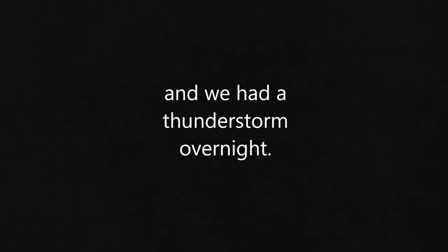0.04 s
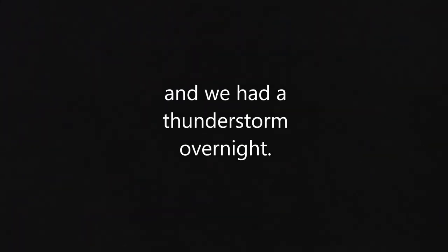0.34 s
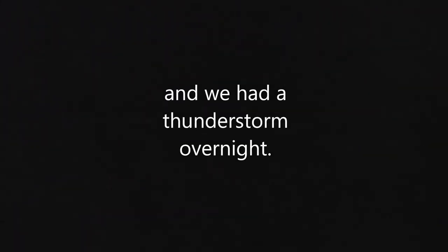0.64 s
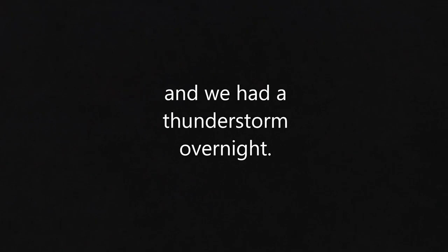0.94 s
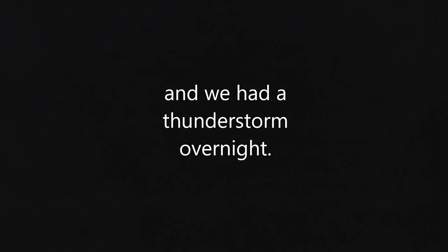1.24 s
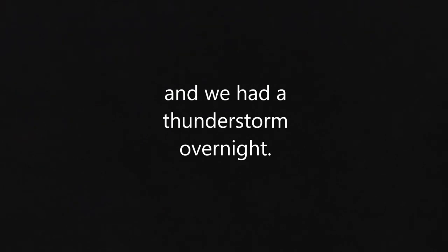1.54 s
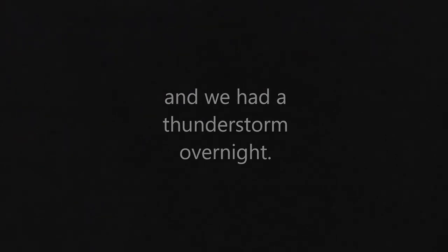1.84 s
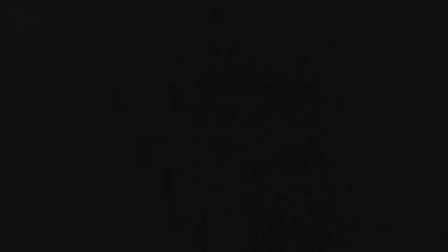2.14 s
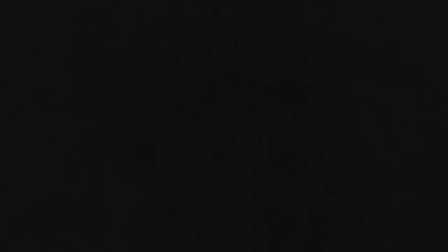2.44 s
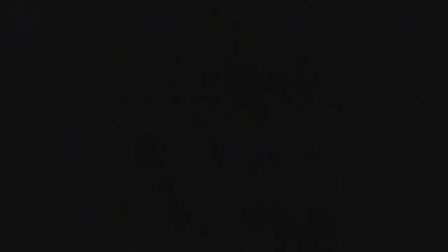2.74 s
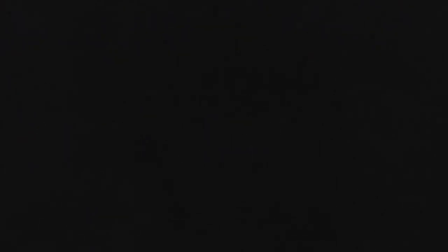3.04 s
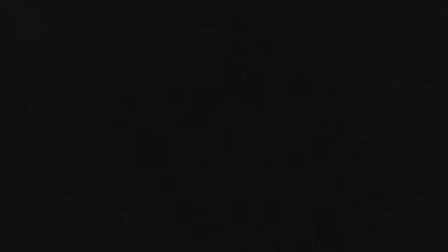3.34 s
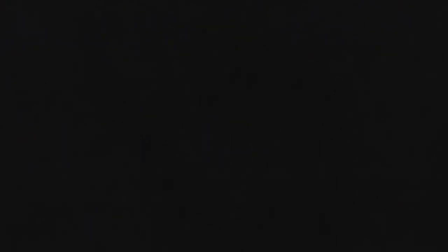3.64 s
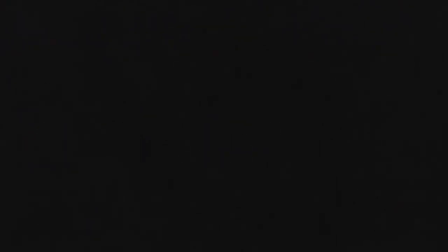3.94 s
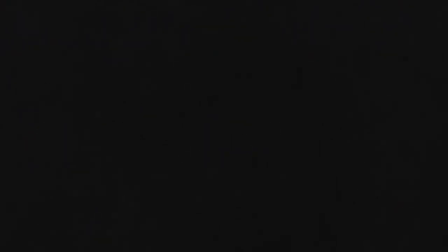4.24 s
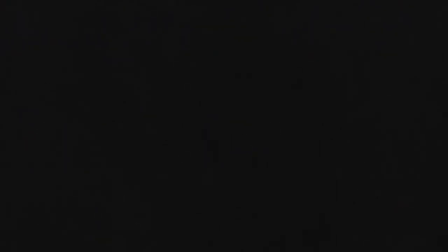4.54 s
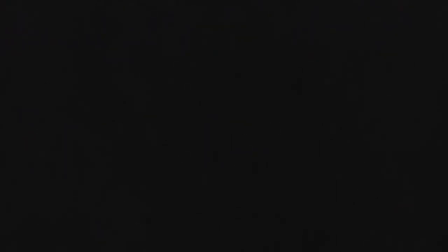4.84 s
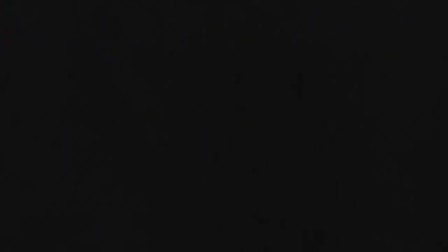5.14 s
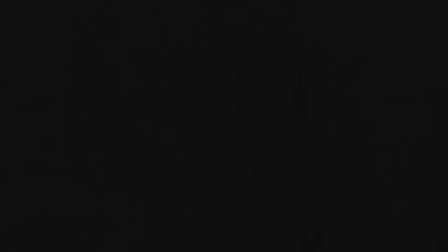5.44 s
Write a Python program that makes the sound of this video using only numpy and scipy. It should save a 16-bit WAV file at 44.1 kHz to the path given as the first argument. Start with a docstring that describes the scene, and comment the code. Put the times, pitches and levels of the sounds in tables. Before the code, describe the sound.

Deep thunder rolls from the very start, loudest in the first second, then rumbles on in several weaker peals, swells once more and dies down. Steady rain patters on a tent throughout, with heavier drops tapping and splashing on the taut fabric over a soft hiss of farther rain. The microphone is outdoors at the tent, close to the drops, with the thunder some way off.

```python
"""At a tent in steady rain, thunder rolls in several peals and dies away.
Shock fronts from the lightning channel blur with distance into boom, body and growl.
Near drops pat the taut fabric and splash; countless far ones merge into a wash.
Two spaced microphones hear the bass alike and most drops a little earlier on the left."""
import sys
import numpy as np
from scipy import signal
from scipy.fft import rfft, irfft, next_fast_len
from scipy.io import wavfile
from scipy.ndimage import uniform_filter1d, map_coordinates

SR = 44100
rng = np.random.default_rng(int(sys.argv[2]) if len(sys.argv) > 2 else 0)


def inscribe(sig):
    """Save sig as 16-bit PCM at rate SR to the path in sys.argv[1].

    A 1-D sig is mono; a 2-D sig holds one channel per row.
    Samples are clipped to [-1, 1] before scaling.
    """
    pcm = np.round(np.clip(np.atleast_2d(sig).T, -1, 1) * 32767)
    wavfile.write(sys.argv[1], SR, pcm.astype(np.int16))


N = 251370

# peals of thunder: t/s, hold/s, body level/dB, boom over body/dB, growl over body/dB
PEALS = [(0.03, 0.022, -22, 5, -17), (0.061, 0.028, -12.5, -3, -19), (0.14, 0.085, -22, 2, -9),
         (0.259, 0.061, -19.5, 1.5, -10.5), (0.34, 0.11, -17.5, -1.5, -11.5), (0.49, 0.15, -20, 1.5, -7.5),
         (0.68, 0.2, -28.5, 2.5, 0.5), (1.04, 0.02, -23.5, -5, -14.5), (1.185, 0.019, -21, -5, -9),
         (1.25, 0.088, -22.5, -3.5, -10.5), (1.559, 0.041, -24.5, -2, -4.5), (1.73, 0.081, -34.5, 4, 8),
         (1.867, 0.026, -21.5, 6, -1.5), (1.945, 0.037, -22, 7, -0.5), (1.999, 0.063, -18.5, 1, -0.5),
         (2.09, 0.078, -23, -7, -12), (2.26, 0.1, -27, 4.5, -2), (2.4, 0.078, -29, 5, 4),
         (2.66, 0.11, -30.5, 0.5, -2), (2.851, 0.042, -27, -18, 3.5), (2.95, 0.04, -25.5, -2.5, -1),
         (3.015, 0.024, -20, 0.5, -4), (3.209, 0.12, -29.5, 2.5, 5), (3.554, 0.022, -25, 0, 0),
         (3.615, 0.061, -26.5, -6, 4.5), (3.674, 0.04, -22.5, 1, 0), (3.858, 0.275, -20.5, -2, -3.5),
         (4.15, 0.071, -23.5, 2, 2.5), (4.28, 0.045, -29.5, 1.5, -7.5), (4.74, 0.032, -32, -1.5, 2),
         (4.96, 0.022, -27, 2, -2), (5.22, 0.12, -33, 2, 2), (5.509, 0.095, -39.5, 7, -27)]
# the heaviest close drops: t/s, pat/dB, pat pitch/Hz, splash/dB, spray/dB, side (+ left, - right)
HEAVY_DROPS = [(0.0557, -21.5, 875, -32.5, -42, .1), (0.064, -22, 1020, -49, -53, -.8),
               (0.0841, -29, 745, -39, -44, -1), (0.2986, -28.5, 1230, -37.5, -48.5, -1.1),
               (0.375, -23, 930, -30, -45, 0.72), (0.4102, -26.5, 980, -46, -50, .6),
               (0.4506, -45, 900, -51, -48, .8), (0.4678, -37, 690, -42, -44, 1),
               (0.5833, -25, 666, -38.5, -46, 0.58), (0.6061, -26, 880, -40, -46, .4),
               (0.6126, -23.5, 965, -41, -48, 0.94), (0.6844, -32, 920, -51, -50, -0.67),
               (0.7454, -25.5, 1250, -42, -52, -0.12), (0.753, -28.5, 1100, -36, -48.5, 0.66),
               (0.9614, -33.5, 1330, -40, -51.5, .2), (0.9677, -24, 960, -37.5, -45, .7),
               (1.0529, -36, 1480, -37.5, -49, -1), (1.1577, -34, 1290, -37, -42.5, 0.61),
               (1.2874, -30, 985, -35.5, -50, .6), (1.3003, -30, 960, -35, -54, .3),
               (1.5264, -22.5, 1140, -37, -53, 0.19), (1.5363, -31, 1080, -38, -47, 0.87),
               (1.7217, -33, 955, -38, -44.5, .5), (1.867, -21.5, 745, -41, -52, .9),
               (1.8737, -27, 870, -41, -48.5, .9), (1.9549, -26, 834, -42, -49, .8),
               (2.0878, -29.5, 910, -38.5, -42, 0.8), (2.1794, -27, 1060, -30, -41, 1),
               (2.2449, -29, 1130, -34, -47, .8), (2.2767, -28, 890, -36, -42, 0.92),
               (2.3149, -29, 805, -28.5, -43, 0.25), (2.3403, -26, 770, -41, -51, 0.87),
               (2.5404, -34, 855, -37.5, -46, -1.3), (2.7251, -30, 860, -33, -47, 0.86),
               (2.7385, -26, 1040, -33, -42.5, .5), (2.7716, -24.5, 864, -34, -45, 1),
               (2.89, -30, 725, -48, -60, 0.97), (2.9532, -23.5, 1060, -34, -48, 0.99),
               (3.0224, -23, 754, -39, -58, 0.91), (3.1025, -23.5, 930, -33.5, -49, 0.95),
               (3.1949, -29, 1110, -32, -45, -1), (3.2959, -26, 1160, -32.5, -51, -1.1),
               (3.3611, -33.5, 1350, -41, -57, 1), (3.5174, -26.5, 1080, -39, -52, 1),
               (3.782, -31, 890, -35.5, -57, 0.79), (3.8466, -29, 1020, -34.5, -51, 0.9),
               (4.1533, -19.5, 905, -30, -41.5, 1), (4.227, -18.5, 748, -36, -58, 0.94),
               (4.3386, -25, 764, -41, -62, 1), (4.3529, -26, 840, -35, -57, .7),
               (4.3808, -20.5, 1270, -39, -51, 0.91), (4.429, -26.5, 950, -54, -70, 0.74),
               (4.4458, -25.5, 1370, -35.5, -50, -.2), (4.4553, -25.5, 1190, -37, -56, .6),
               (4.5464, -27.5, 740, -34, -43, 0.25), (4.7157, -34, 1330, -36, -49, 0.72),
               (4.8071, -24.5, 900, -33, -45.5, 0.98), (4.8562, -27, 1090, -47, -57, 0.98),
               (5.0715, -27, 1020, -35, -51, 1), (5.0869, -29, 1260, -32.5, -42.5, .7),
               (5.2226, -25, 784, -37.5, -47, .7), (5.2709, -31, 850, -37.5, -46, 1),
               (5.2835, -21.5, 1070, -38, -51, 1), (5.3123, -27.5, 940, -32.5, -45, -.2),
               (5.3297, -46, 920, -37, -43.5, 1), (5.374, -24, 710, -33, -48, .9),
               (5.4338, -25, 880, -41, -49, -0.85), (5.649, -17.5, 1020, -31.5, -46, 1),
               (5.673, -25, 1140, -41, -50, 1), (5.6777, -27.5, 890, -28, -49, .9)]
# strength of the rain: t/s, level/dB
RAIN_LEVEL = [(0.0, -45.5), (0.2, -52.5), (0.7, -50), (1.45, -50), (2.2, -47), (2.6, -48.5), (3.45, -48.5),
              (4.38, -47.5), (4.6, -48.5), (5.3, -46.5), (5.7, -49.5)]
# bright tone of fine spray: f/Hz, level/dB
SPRAY_SPECTRUM = [(4000, -37), (7000, 5), (8500, -3), (10300, -4), (12500, -1.5), (16000, -1)]
MIC_DELAY_MS = 0.41  # between the microphones, for a drop at side 1


def thunder(right_db=0.77, echo_boom_db=-2.5, echo_growl_db=-1.5, rasp_per_growl=1.04):
    """Far parts of the channel boom, nearer ones add body, growl and rasp; all a little to the right."""
    # the deep boom: f/Hz, level/dB
    boom_spectrum = [(10, -34), (25, -19), (42, -8), (62, 2), (85, 1.5), (115, -3.5), (160, -20.5),
                     (300, -85)]
    # the body of the roll: f/Hz, level/dB
    body_spectrum = [(60, -37.5), (105, -3.5), (135, 2), (200, 2.5), (260, -2.5), (320, -24.5), (500, -76)]
    # the midrange growl: f/Hz, level/dB
    growl_spectrum = [(170, -31), (260, -2.5), (300, 3.5), (365, 2.5), (440, -7.5), (520, -8.5), (650, -15),
                      (760, -15), (1100, -21), (1800, -35.5), (4000, -91)]
    # the growl's rasping upper edge, which swells and fades with it: f/Hz, level/dB
    rasp_spectrum = [(330, -50), (430, 2), (520, 6), (620, -3), (760, 2.5), (950, -14), (1500, -40.5)]
    boom_db, growl_db = np.transpose(PEALS)[3:, :, None]
    # the bass lingers longer; later echoes have come further and are boomier
    boom_level = roll_level(boom_db, echo_boom_db, fall_db_per_s=127, echo_gain_db_per_s=0.55)
    rasp_level = roll_level(rasp_per_growl * growl_db, rasp_per_growl * echo_growl_db)
    boom = amp(-0.34) * boom_level * rumble(boom_spectrum, window=3000)
    body = amp(-0.36) * roll_level(0, 0) * rumble(body_spectrum)
    growl = amp(-0.98) * roll_level(growl_db, echo_growl_db) * rumble(growl_spectrum)
    rasp = amp(-14.5) * rasp_level * rumble(rasp_spectrum)
    return (boom + body + growl + rasp + claps()) * amp([[-right_db], [right_db]])


def roll_level(peal_db, echo_db, attack_s=0.03, fall_db_per_s=220, echo_gain_db_per_s=0):
    """Each peal swells, holds and falls away; its power adds to that of the echoes."""
    # echoes from the land around, fading under the peals: t/s, level/dB
    echo_level = [(0.0, -19.5), (0.95, -29.5), (1.42, -32), (2.2, -26.5), (2.7, -29.5), (3.45, -32),
                  (4.3, -30.5), (4.5, -32), (5.7, -36)]
    onset, hold, body_db = np.transpose(PEALS)[:3, :, None]
    t = np.linspace(0, N / SR, 4000)
    swell = np.clip(1 + (t - onset) / attack_s, 0, 1)
    peals = swell * amp(body_db + peal_db - fall_db_per_s * np.maximum(t - onset - hold, 0))
    echoes = amp(np.interp(t, *np.transpose(echo_level)) + echo_db + echo_gain_db_per_s * t)
    return np.interp(np.arange(N) / SR, t, np.sqrt(np.sum(peals ** 2, axis=0) + echoes ** 2))


def rumble(spectrum, count=5000, window=2000):
    """Shock fronts from all along the lightning channel, blurred by distance, at an even level."""
    # stereo image, mono in the bass and wide above: f/Hz, left-right correlation
    image = [(60, 1), (130, 0.92), (220, 0.84), (340, 0.64), (480, -0.22), (700, -0.13), (1100, -0.67)]
    shocks = [placed(rng.uniform(0, N / SR, count), rng.normal(size=(count, 1))) for _ in range(2)]
    pair = spread(np.array(shocks), spectrum, image)
    power = uniform_filter1d(np.mean(pair ** 2, axis=0), window)
    return pair / np.sqrt(np.abs(power) + 1e-6)


def claps(cycles=0.73, level_db=-3.5, edge_db=-15, edge_ratio=2.7):
    """Each strong front is a short low push with a steep edge that swings back once or twice."""
    # shock fronts that stand out of the roll: t/s, level/dB, f/Hz
    fronts = [(0.067, 2, 172), (0.086, 0, 150), (0.275, 1.5, 114), (0.344, -1, 153), (0.395, -0.5, 170),
              (0.515, -2.5, 138), (0.62, -3, 125), (1.054, -5.5, 146), (2.008, -9.5, 161),
              (2.442, -4.5, 221), (3.288, -9.5, 240), (3.893, -5, 161), (4.041, -6, 152),
              (4.237, -5.5, 290)]
    times, db, hz = np.transpose(fronts)[:, :, None]
    t = np.arange(-SR // 50, SR // 50) / SR
    swing = lambda f: np.cos(2 * np.pi * (f * t + rng.random(f.shape))) * np.exp(-(f * t / cycles) ** 2)
    push = swing(hz) + amp(edge_db) * swing(edge_ratio * hz)
    return placed(times[:, 0] + t[0], amp(db + level_db) * push)


def strike(drops, shared_splash=0.85, detune=0.1, size=400):
    """A drop dents the fabric (pat), bursts (splash) and throws off a fine spray."""
    # the fabric's modes under a drop: multiple of the pat pitch, level/dB, t60/s
    fabric_modes = [(.7, -9.5, 0.0062), (0.999, 14.5, 0.0032), (1.9, -10, 0.0092)]
    # wet tone of the burst: f/Hz, level/dB
    splash_spectrum = [(600, -26.5), (1700, -4.5), (2300, -3), (3100, 3), (4000, 0), (4800, -5.5),
                       (6300, -5), (8300, -37), (12000, -29)]
    times, pat_db, hz, splash_db, spray_db, lag_ms = np.transpose(drops)
    t = np.arange(size) / SR
    # a drop takes about half a millisecond to flatten; its burst peaks after one and is soon over
    swell = 1 - np.exp(-(t / .0005) ** 2)
    puff = t ** 2 * np.exp(-t / .0005)
    burst = lambda: rng.standard_normal((len(times), size)) * puff
    chance = lambda: rng.standard_normal((len(times), 1))
    pat = 0
    for ratio, db, t60 in fabric_modes:  # every spot has its own tension and mix of modes
        decay = amp(db + 2 * chance() - 60 * t / t60)
        mode_hz = ratio * hz[:, None] * np.exp(detune * chance())
        pat += swell * decay * np.sin(2 * np.pi * mode_hz * t)
    arrivals = times - lag_ms / 2000, times + lag_ms / 2000  # left, right
    # the splash is partly the same on both sides, the spray scatters differently to each
    common = shared_splash * burst()
    pats = np.array([placed(at, levelled(pat, pat_db)) for at in arrivals])
    splashes = np.array([placed(at, levelled(common + burst(), splash_db)) for at in arrivals])
    sprays = np.array([placed(at, levelled(burst(), spray_db)) for at in arrivals])
    wet = amp(0.03) * coloured(splashes, splash_spectrum) + amp(3.0) * coloured(sprays, SPRAY_SPECTRUM)
    # pats lean right, the wet sound leans left
    return amp(-0.63) * pats * amp([[-.7], [.7]]) + wet * amp([[.84], [-.84]])


def heavy_drops():
    """Rows for strike: the side on which a drop lands sets the delay between the microphones."""
    return np.array([(*drop, MIC_DELAY_MS * side) for *drop, side in HEAVY_DROPS])


def medium_drops(count=76, pat_db=-35.0, splash_db=-43, spray_db=-55, scatter_db=3.5, pitch_hz=950,
                 left_share=.8, bunched_share=.6, bunch_s=.035):
    """Rows for strike: many medium drops bunch with the heavy ones, the rest fall anywhere."""
    pick = (np.arange(count) + rng.random(count)) / count
    heavy_times = np.array(HEAVY_DROPS)[(pick * len(HEAVY_DROPS)).astype(int), 0]
    beside_heavy = heavy_times + bunch_s * rng.standard_normal(count)
    times = np.where(rng.random(count) < bunched_share, beside_heavy, pick * N / SR)
    pat, pitch, wet, fine = np.clip(rng.standard_normal((4, count)), -2, 2)
    side = np.where(rng.random(count) < left_share, 1, -1)
    return np.transpose([times, pat_db + scatter_db * pat, pitch_hz * np.exp(.2 * pitch),
                         splash_db + scatter_db * wet, spray_db + scatter_db * (wet + fine),
                         MIC_DELAY_MS * side])


def patter(count=1700, pat_db=-45, splash_db=-53, spray_db=-66, pitch_hz=1000, left_share=.8):
    """Smaller drops all over the tent, most of them on its left slope."""
    times = rng.uniform(0, N / SR, count)
    weight, pitch, wet, fine, place = rng.standard_normal((5, count))
    lag_ms = np.where(rng.random(count) < left_share, .44, -.42) + .08 * place
    rain_db = curve(RAIN_LEVEL)
    size_db = 3.5 * np.minimum(weight, 1.7) + (rain_db - rain_db.mean())[(times * SR).astype(int)]
    wet_db = size_db + 2 * wet
    return strike(np.transpose([times, pat_db + size_db, pitch_hz * np.exp(.3 * pitch),
                                splash_db + wet_db, spray_db + wet_db + 2 * fine, lag_ms]))


def droplets(drops, count=8, flight_s=0.013, level_db=-5, scatter_db=4):
    """Each close drop throws off droplets that land again within a few hundredths of a second."""
    times, _, _, _, spray_db, _ = np.repeat(drops, count, axis=0).T
    window = np.hanning(SR // 900)
    landing = times + flight_s * rng.exponential(size=len(times))
    gain = amp(spray_db + level_db + scatter_db * np.minimum(rng.standard_normal(len(times)), 2))
    envelopes = gain[:, None] * window
    ticks = [placed(landing, envelopes * rng.standard_normal(envelopes.shape)) for _ in range(2)]
    return coloured(np.array(ticks), SPRAY_SPECTRUM)


def panel_ring(drops, size=1200):
    """The taut panel's own notes colour every drop that lands on it."""
    # modes that ring on after a drop: f/Hz, level/dB, t60/s
    panel_modes = [(750, -44, 0.023), (1976, -34, 0.0088), (2860, -44, .014)]
    t = np.arange(size) / SR
    ring = sum(amp(db - 60 * t / t60) * np.sin(2 * np.pi * hz * t) for hz, db, t60 in panel_modes)
    return signal.fftconvolve(drops, ring[None], axes=1)[:, :N]


def tent_reverb(drops, t60=0.056, rise_s=0.0014, level_db=-6, size=4000, count=24):
    """Ground and walls scatter a very short tail, a different one as the drops land here and there."""
    t = np.arange(size) / SR
    tails = rng.standard_normal((count, 2, size)) * amp(-60 * t / t60) * (1 - np.exp(-t / rise_s))
    tails /= np.linalg.norm(tails, axis=2, keepdims=True)
    out, step = np.zeros((2, N + size)), N // count + 1
    for start, tail in zip(range(0, N, step), tails):
        reflected = signal.fftconvolve(drops[:, start:start + step], tail, axes=1)
        out[:, start:start + reflected.shape[1]] += reflected
    return amp(level_db) * out[:, :N]


def wash(level_db=9.5, flutter_db=1):
    """Far rain on ground and leaves merges into a softly fluttering hiss."""
    # tone of the far rain: f/Hz, level/dB
    spectrum = [(200, -9.5), (450, 6), (750, 4), (1100, -0.5), (1750, -6.5), (2300, -9.5), (3200, -11),
                (4700, -17), (6500, -21.5), (8300, -30.5), (10500, -32), (12500, -26), (16000, -36)]
    # its wide stereo image: f/Hz, left-right correlation
    image = [(300, 0.11), (550, 0.038), (1000, -0.77), (1450, -0.76), (1950, 0.033), (3000, -0.42),
             (6000, 0.14)]
    flutter = map_coordinates(rng.standard_normal(N // 2000 + 4), [np.arange(N) / 2000])
    hiss = spread(rng.standard_normal((2, N)), spectrum, image)
    return amp(curve(RAIN_LEVEL) + level_db + flutter_db * flutter) * hiss


def amp(db):
    """Decibels to gain."""
    return 10 ** (np.asarray(db) / 20)


def along(points, hz):
    """Read (f/Hz, value) points on a log axis."""
    f, values = np.transpose(points)
    return np.interp(np.log(hz + 1), np.log(f + 1), values)


def curve(points):
    """Read (t/s, value) points at every sample."""
    return np.interp(np.arange(N) / SR, *np.transpose(points))


def filtered(x, response):
    """Filter x by a gain given as a function of frequency."""
    size = next_fast_len(N + SR // 2)
    return irfft(rfft(x, size) * response(np.fft.rfftfreq(size, 1 / SR)), size)[..., :N]


def coloured(x, spectrum, size=1024):
    """Causal filter of unit energy: clicks keep their sharp front."""
    cepstrum = irfft(np.log(amp(along(spectrum, np.fft.rfftfreq(size, 1 / SR)))))
    cepstrum[1:size // 2] *= 2  # fold to minimum phase
    cepstrum[size // 2 + 1:] = 0
    kernel = irfft(np.exp(rfft(cepstrum)))
    return signal.fftconvolve(x, kernel[None] / np.linalg.norm(kernel), axes=1)[:, :N]


def spread(pair, spectrum, image):
    """Two unrelated signals become a left and right of given colour and correlation, at rms 1."""
    def mid_side_gains(hz):
        width = np.arccos(np.clip(along(image, hz), -1, 1)) / 2
        return amp(along(spectrum, hz)) * [np.cos(width), np.sin(width)]
    mid, side = filtered(pair, mid_side_gains)
    stereo = np.array([mid + side, mid - side])
    return stereo / np.sqrt(np.mean(stereo ** 2) + 1e-20)


def levelled(grains, db, span_s=.003):
    """Give each grain the energy of its level held for span_s."""
    return grains * amp(db)[:, None] * np.sqrt(span_s * SR / np.sum(grains ** 2, axis=1, keepdims=True))


def placed(times, grains):
    """Sum one grain per row at its time."""
    index = np.round(times * SR).astype(int)[:, None] + np.arange(grains.shape[1])
    inside = (index >= 0) & (index < N)
    return np.bincount(index[inside], grains[inside], N)


def scene():
    """Thunder behind the rain on the tent."""
    near = np.vstack([heavy_drops(), medium_drops()])
    drops = amp(0.2) * strike(near) + patter()
    return thunder() + drops + panel_ring(drops) + tent_reverb(drops) + droplets(near) + wash()


def record(dry):
    """The loudest peaks are rounded off, and nothing is kept above 16 kHz."""
    rounded = dry / (1 + np.abs(dry) ** 8) ** (1 / 8)
    return filtered(rounded, lambda hz: hz < 16000)


dry = scene()
out = record(dry)
inscribe(out)
```